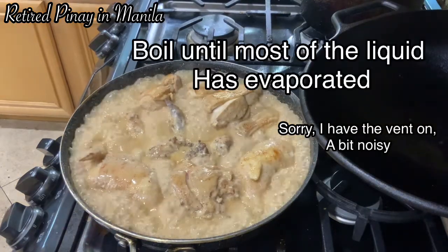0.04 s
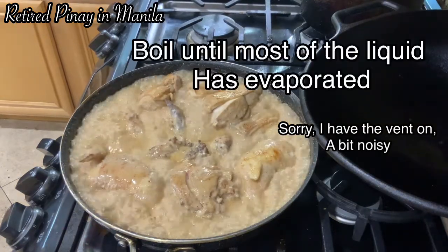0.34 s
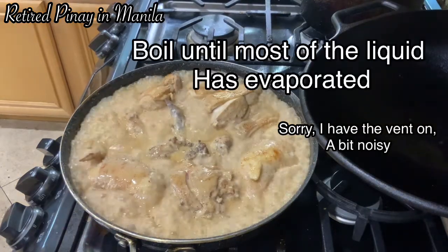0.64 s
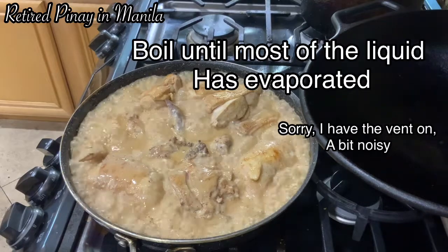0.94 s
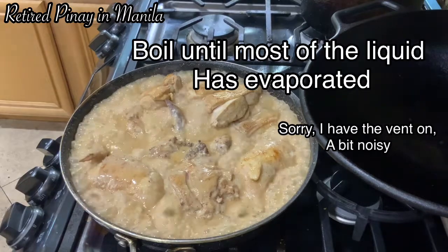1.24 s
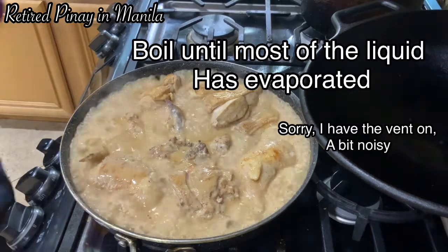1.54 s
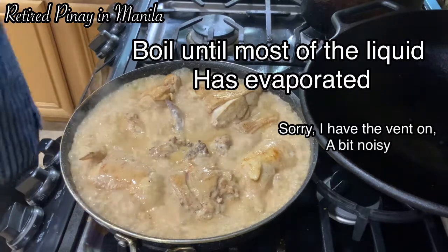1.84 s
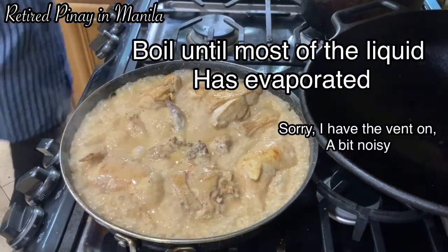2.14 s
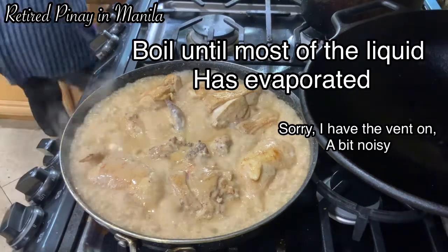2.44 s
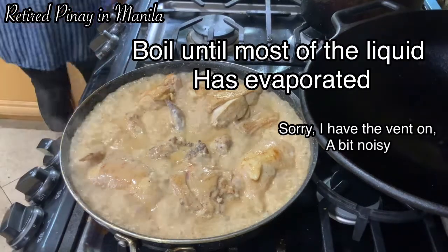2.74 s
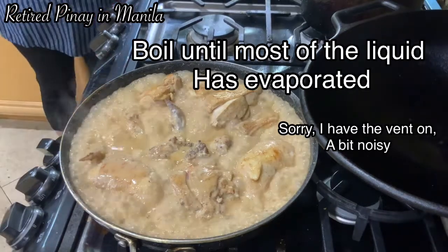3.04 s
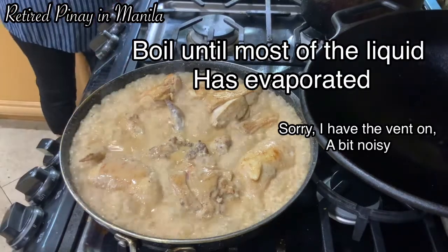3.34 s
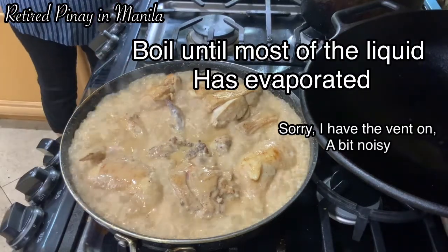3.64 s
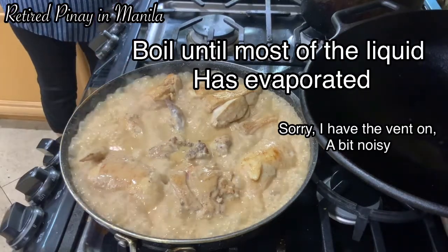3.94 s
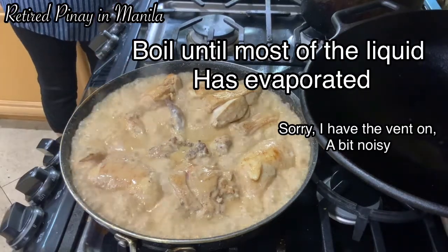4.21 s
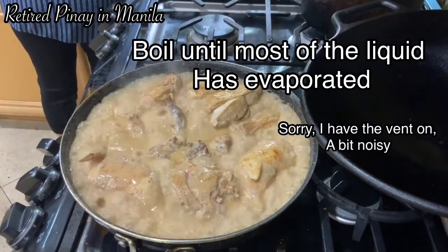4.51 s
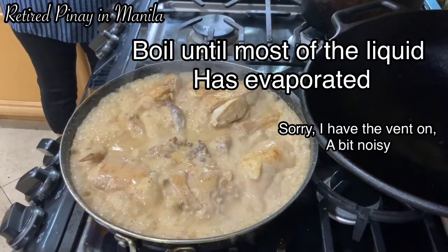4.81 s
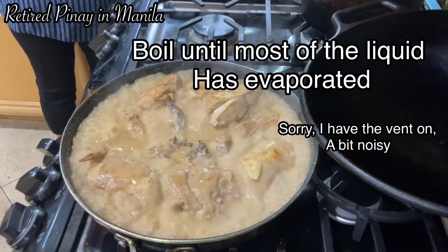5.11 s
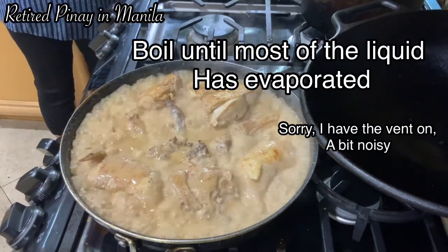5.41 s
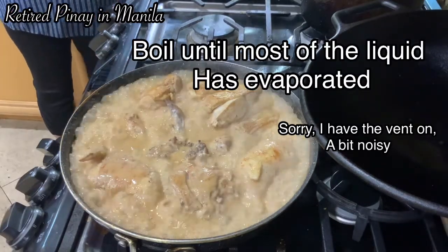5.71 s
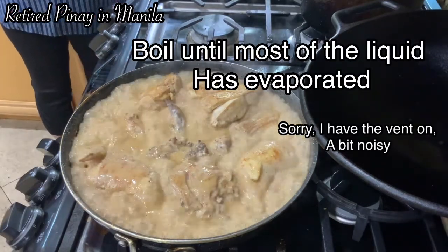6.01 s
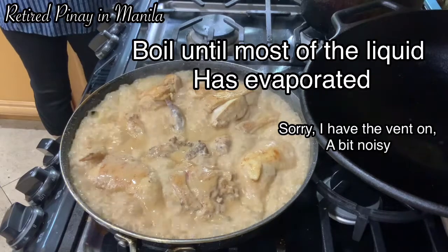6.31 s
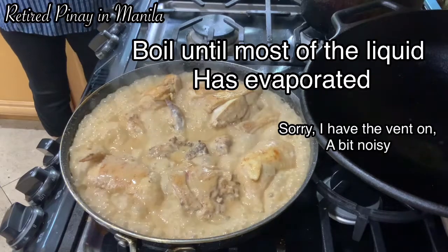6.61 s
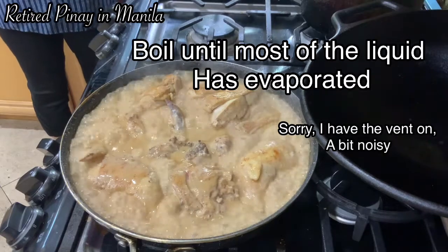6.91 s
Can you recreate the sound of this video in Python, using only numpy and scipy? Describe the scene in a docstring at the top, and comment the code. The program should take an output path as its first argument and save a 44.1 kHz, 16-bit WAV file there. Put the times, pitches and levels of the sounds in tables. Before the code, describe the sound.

A range hood fan roars steadily in a small home kitchen, with a stew fizzing and popping softly beneath it. Partway through, utensils knock on the counter a few steps away, and a spoon drops into a metal bowl with a loud, briefly ringing clatter. A tap then starts hissing and later runs a little harder, with small splashes in the sink. The microphone is close to the stove.

```python
"""Kitchen under a range hood

Turbulent air roars in the resonances of a hood and duct, over the bursting bubbles of a simmering stew.
A few steps away utensils knock on the counter, and a spoon drops into a metal bowl, exciting the modes
of both; then a tap hisses with the impacts of countless drops. A close pair of microphone ports picks
up the small kitchen, and a limiter ducks the loudest clatter."""
import sys
import numpy as np
from scipy import signal
from scipy.fft import rfft, irfft, next_fast_len
from scipy.io import wavfile
from scipy.ndimage import uniform_filter1d

SR = 44100
rng = np.random.default_rng(int(sys.argv[2]) if len(sys.argv) > 2 else 0)


def generate_wav(sig):
    """Save sig (samples, or channels by samples) to the path in sys.argv[1] as 16-bit PCM at SR."""
    pcm = np.round(np.clip(np.atleast_2d(sig).T, -1, 1) * 32767).astype(np.int16)
    wavfile.write(sys.argv[1], SR, pcm)


N = 311346
BLOW_SAMPLES = 2 ** 15

# Spectrum of air rushing through the hood: frequency_hz, density_db
AIR_SPECTRUM = [(15, -69), (32, -39), (45, -28), (70, -7.5), (110, -4), (170, -6), (300, -13.5), (480, -13),
                (720, -13), (1050, -17), (1900, -24.5), (2700, -31.5), (6000, -33.5), (16000, -47)]
# Resonances of hood and duct: centre_hz, width_hz, lift_db
DUCT_RESONANCES = [(88.5, 19, 1), (111.6, 27.5, 6.5), (174, 29, -2.5), (208.6, 18, 2.5), (219.4, 12, 5),
                   (268.6, 63, 4), (312, 29, -2.5), (363, 35, 5), (482, 44, 6), (587, 22, -1.5),
                   (611.6, 20, 7), (708, 30, 4.5), (815, 18, 5), (986, 16, -2), (1136, 25, -5),
                   (1250, 270, 1.5), (2044, 170, 3)]
# Faint tones of the motor: pitch_hz, level_db
MOTOR_TONES = [(110, -37), (1702, -50)]
# Rises of the deep rumble: centre_s, half_width_s, level_db
RUMBLE_SWELLS = [(2.93, 0.061, -34), (3.4, 0.1, -36), (7.0, .35, -38)]
# Spectrum of bubbling in the pan: frequency_hz, density_db
SIMMER_SPECTRUM = [(500, -22), (2000, -4), (3500, -5), (7000, -1.5), (10000, -7), (13000, -7),
                   (16000, -15.5)]
# Larger bubbles bursting, and after the tap opens, drips landing: start_s, level_db
SMALL_POPS = [(.072, -31), (.677, -31.5), (.905, -25.5), (1.062, -30.5), (1.545, -27), (1.572, -31.5),
              (5.023, -28), (5.556, -25), (6.043, -25.5), (6.777, -27)]
# Utensils knocking as they are moved: start_s, clack_db, clack_hz, shine_db, thud_db, thud_hz, ring_db
UTENSIL_KNOCKS = [(2.629, -19.5, 8450, 5, -24, 700, -23), (2.804, -21.5, 12000, 5.5, -24, 400, -26),
                  (2.902, -11.5, 5800, 5, -19, 250, -18.5), (2.910, -21, 5800, 2, -33, 1300, -25),
                  (2.918, -28, 1800, 0, -16.5, 300, -33), (2.940, -26, 5800, -2, -33, 300, -27),
                  (2.983, -19, 2520, -5, -10, 260, -32), (3.005, -32, 5000, -6, -19.5, 690, -35),
                  (3.032, -33, 4500, -4, -15, 170, -43), (3.163, -31, 4000, 0, -27, 450, -34),
                  (3.501, -31, 7500, 0, -36, 250, -39)]
# Spectrum of a hard impact: frequency_hz, density_db
CLACK_SPECTRUM = [(100, -22.5), (900, 10.5), (1300, -11), (1650, 2), (2100, -4), (2500, -0.5), (3500, -4.5),
                  (4700, -0.5), (5800, 1), (7200, -0.5), (8600, -3.5), (10500, -13), (12600, -11.5),
                  (13500, -14), (16000, -26)]
# Modes of the cutlery: pitch_hz, level_db, t60_s
CUTLERY_MODES = [(1680, -3, .35), (2660, -9, .33), (3060, -10, .33), (3870, -6, .22), (4690, 1.5, .2),
                 (5330, 0, .17), (6040, 2, .14), (6270, -2, .16), (6930, 1, .18), (8200, 0, .16),
                 (8430, -1, .15), (9436, -1, .14), (9900, -2, .12), (12000, -6, .1)]
# Resonances of the counter: centre_hz, width_hz, lift_db
COUNTER_RESONANCES = [(195, 64, -4), (297, 33, 5.5), (363, 18, 6.5), (478, 46, 7), (556, 53, -2),
                      (796, 180, 3), (940, 110, 5.5), (1117, 88, 6)]
# The spoon touches the bowl, rattles into it and rebounds:
# start_s, clack_db, clack_hz, shine_db, thud_db, thud_hz, bowl_db, spoon_db, reach_hz
SPOON_BLOWS = [(2.759, -45, 4700, 0, -28, 600, -50, -39, 6000),
               (3.223, -25, 8000, 6, -33, 810, -50, -43, 15000),
               (3.234, -22, 12000, 3, -36, 600, -50, -43, 15000),
               (3.251, -16.5, 2450, 4, -20, 300, -38, -22, 14000),
               (3.270, -19, 11500, 4, -19.5, 800, -35, -34, 15000),
               (3.281, -8, 1610, 6, -14, 400, -30, -23, 15000),
               (3.289, -5, 4500, 6, -7, 750, -9.5, -17, 16000),
               (3.298, -11, 12000, 3, -12, 900, -28, -34, 16000),
               (3.354, -24, 3000, -5, -8, 740, -24, -21, 3380)]
# Modes of the metal bowl: pitch_hz, level_db, t60_s
BOWL_MODES = [(520, 3, .2), (646, -2, .3), (915, 7, .33), (1150, -2, .3), (1525, 5, .14), (1700, -1, .36),
              (2130, -5, .15), (2508, -7, .15), (2652, -3, .42), (3035, -7, .52), (3872, -.5, .57),
              (4048, -7, .36), (4605, 5, .3), (5283, 1.5, .36), (6182, 5.5, .31), (6418, -4.5, .52),
              (6558, -3, .33), (7980, 11, .3), (8330, 1.5, .23), (8516, 2.5, .22), (9969, -1, .2),
              (10500, -2, .18), (11150, -3, .17), (11447, -1, .2), (12620, -2, .17), (13345, -7, .2),
              (14949, -7, .17)]
# Modes of the spoon: pitch_hz, level_db, t60_s
SPOON_MODES = [(2540, -5, .08), (3157, -1.5, .27), (4500, -1, .07), (4686, 5, .14), (5500, -7, .08),
               (5950, -5, .1), (6600, -4, .14), (7250, -5, .09), (8060, -5, .11), (8750, -4, .1),
               (9100, -4, .12), (11902, -7, .12), (13748, -10, .12)]
# Spray added by each turn of the tap: start_s, level_db
TAP_OPENINGS = [(3.77, -35.5), (5.52, -35)]
# Spectrum of the tap water: frequency_hz, density_db
SPRAY_SPECTRUM = [(400, -27), (2000, -8.5), (3900, -7.5), (4900, -4.5), (5400, -2.5), (6500, -1),
                  (10000, -1.5), (12500, -0.5), (16000, -10)]
# The stream catching something in the sink: centre_s, half_width_s, level_db
SINK_SPLASHES = [(4.02, 0.035, -30), (4.27, 0.039, -33), (5.81, 0.023, -26.5), (5.95, .025, -31)]
# Likeness of the sound at the two ports: frequency_hz, coherence
PORT_COHERENCE = [(50, .995), (110, .985), (200, .95), (300, .86), (450, .72), (800, .42), (1250, .68),
                  (1950, .2), (2400, .53), (3000, .5), (3800, .95), (4500, .77), (8300, .8), (9100, .999),
                  (10700, .999), (11200, .7), (12900, .65), (13300, .99)]
# Phase by which the left port leads: frequency_hz, lead_rad
PORT_PHASE = [(110, 0), (250, .15), (340, .8), (460, .1), (520, .9), (620, 2.5), (900, 3.7), (1000, 5.7),
              (1350, 6.1), (1650, 4.3), (1950, 4.9), (2300, 3.5), (2900, 1.1), (3500, .05), (6500, -1.05),
              (8000, -2.0), (9000, -3.13), (10850, -3.16), (11150, -3.9), (12900, -5.3), (13300, -6.28)]
# Level of the left port above the right: frequency_hz, balance_db
PORT_BALANCE = [(50, 0), (150, -1), (250, 0), (315, -1), (370, 3.5), (440, 3.5), (520, -1.5), (690, 4),
                (900, -2.5), (1050, 0), (1450, -2), (1850, 1), (2060, -5), (2400, -1), (6000, 0)]


def gain_of(db):
    """Amplitude ratio of a level in decibels."""
    return 10 ** (np.asarray(db) / 20)


def unit_rms(x):
    """Normalisation to an rms of 1."""
    return x / np.sqrt(np.mean(x ** 2) + 1e-20)


def curve_at(points, hz):
    """Interpolation of a table along a logarithmic frequency axis."""
    table_hz, value = np.transpose(points)
    return np.interp(np.log(hz + 1), np.log(abs(table_hz) + 1), value)


def lifts(resonances, hz):
    """Gain in dB of a set of resonances, each a Gaussian peak or dip."""
    return sum(db * np.exp(-2 * ((hz - centre) / width) ** 2) for centre, width, db in resonances)


def hump(hz, centre_hz, slope_db):
    """Gain in dB of a broad resonance, slope_db down one octave from its centre."""
    return -slope_db * np.log2((hz + 1) / centre_hz) ** 2


def coloured(x, db_at):
    """Spectral shaping by a gain in dB at each frequency; rms 1."""
    size = x.shape[-1]
    padded = next_fast_len(size)
    response = gain_of(db_at(np.fft.rfftfreq(padded, 1 / SR)))
    return unit_rms(irfft(rfft(x, padded) * response, padded)[..., :size])


def drift(top_hz):
    """Slow fluctuation from sinusoids of random phase; rms 1."""
    t = np.arange(0, N + 256, 256) / SR
    rates_hz = np.geomspace(top_hz / 20, top_hz, 20)
    slow = sum(np.sin(2 * np.pi * (hz * t + rng.random())) / np.sqrt(hz) for hz in rates_hz)
    return np.interp(np.arange(N) / SR, t, unit_rms(slow))


def swell(centre_s, half_width_s):
    """Gaussian envelope that rises to 1 and falls back."""
    return np.exp(-((np.arange(N) / SR - centre_s) / half_width_s) ** 2)


def decay(t, t60_s):
    """Exponential damping of 60 dB in t60_s."""
    return np.exp(-np.log(1000) * t / t60_s)


def add(mix, start_s, sound):
    """Superposition of a sound on the mix from start_s onward."""
    part = mix[:, round(start_s * SR):][:, :sound.shape[1]]
    part += sound[:, :part.shape[1]]


def burst(db_at, rise_s, t60_s, room_db, room_t60_s=0.55):
    """Reverberation of a blow: dense early reflections and the room's weaker tail add in power."""
    t = np.arange(BLOW_SAMPLES) / SR
    early = decay(np.maximum(t - rise_s, 0), t60_s)
    late = gain_of(room_db) * decay(t, room_t60_s)
    envelope = np.hypot(early, late) * np.minimum(t / rise_s, 1)
    return coloured(rng.standard_normal((2, BLOW_SAMPLES)), db_at) * envelope


def crackle(spectrum, per_s, spread_db, room_db, room_t60_s):
    """Shot noise: random impulses of uneven size, each with a short wash of reflections."""
    sizes = gain_of(spread_db * np.minimum(rng.exponential(1, N), 5))
    occurs = rng.random(N) < per_s / SR
    clicks = sizes * occurs * rng.standard_normal((2, N))
    t = np.arange(SR // 4) / SR
    room = rng.standard_normal((2, len(t))) * decay(t, room_t60_s)
    wash = signal.oaconvolve(clicks, room, axes=1)[:, :N]
    return coloured(unit_rms(clicks) + gain_of(room_db) * unit_rms(wash), lambda hz: curve_at(spectrum, hz))


def hood(air_db=-21.5, surge_db=0.03, swell_db=2.5, pitch_waver=0.00312):
    """Broadband turbulence excites the duct resonances, over the wavering tones of the motor."""
    turbulence = rng.standard_normal((2, N))
    air = coloured(turbulence, lambda hz: curve_at(AIR_SPECTRUM, hz) + lifts(DUCT_RESONANCES, hz))
    air *= gain_of(air_db - surge_db * drift(top_hz=6))
    middle = signal.sosfiltfilt(signal.butter(2, [200, 800], "bandpass", fs=SR, output="sos"), air)
    air += middle * (gain_of(swell_db * swell(0.88, 0.29)) - 1)  # the middle of the roar swells once
    for hz, db in MOTOR_TONES:
        cycles = np.cumsum(hz * (1 + pitch_waver * drift(top_hz=5))) / SR
        air[0] += gain_of(db) * 2 * np.sin(2 * np.pi * cycles)  # both ports share the tone
    return air


def rumble(centre_hz=54, slope_db=30, steady_db=-52):
    """Low-frequency band noise lies under the roar and rises now and then."""
    envelope = gain_of(steady_db) + sum(gain_of(db) * swell(s, width) for s, width, db in RUMBLE_SWELLS)
    return envelope * coloured(rng.standard_normal((2, N)), lambda hz: hump(hz, centre_hz, slope_db))


def pan(simmer_db=-37.5):
    """Bursting bubbles emit pressure pulses: small ones merge into a fizz, larger ones pop singly; once the tap
    runs, drips pop singly too."""
    fizz = crackle(SIMMER_SPECTRUM, per_s=2200, spread_db=3.5, room_db=9.5, room_t60_s=0.14)
    out = gain_of(simmer_db) * fizz
    for start_s, db in SMALL_POPS:
        pop = burst(lambda hz: curve_at(SIMMER_SPECTRUM, hz), rise_s=0.0007, t60_s=0.045, room_db=-20)
        add(out, start_s, gain_of(db) * pop)
    return out


def clack(pitch_hz, shine_db, rise_s, t60_s, lift_db=9, lift_octaves=0.14, damp_hz=8500, shine_hz=9000):
    """Brief, hard contact radiates a broad spectrum; sharp edges add treble shine, which dies first."""
    def spectrum(hz):
        shine = shine_db * (1 - 1 / (1 + (hz / shine_hz) ** 8))
        peak = lift_db * np.exp(-(np.log2((hz + 1) / pitch_hz) / lift_octaves) ** 2)
        return curve_at(CLACK_SPECTRUM, hz) + shine + peak
    crack = burst(spectrum, rise_s, t60_s, room_db=-11.5)
    body = signal.sosfiltfilt(signal.butter(2, damp_hz, fs=SR, output="sos"), crack)
    return body + (crack - body) * decay(np.arange(BLOW_SAMPLES) / SR, t60_s=0.58)


def ring(modes, reach_hz, rise_s, flutter_depth=0.55, twin_gain=0.35, mean_beat_hz=14):
    """Free vibration of metal: each damped mode beats with a close twin and flutters in the room."""
    t = np.arange(BLOW_SAMPLES) / SR
    coarse_t = np.linspace(0, t[-1], num=80)
    out = np.zeros((2, BLOW_SAMPLES), complex)
    for hz, db, t60_s in modes:
        real, imaginary = rng.standard_normal((2, 2, len(coarse_t)))
        flutter = flutter_depth * (real + 1j * imaginary) / np.sqrt(2)
        beat_hz = mean_beat_hz * (0.5 + rng.random((2, 1)))
        twin = twin_gain * np.exp(2j * np.pi * beat_hz * coarse_t)
        envelope = (1 + twin + flutter) * decay(coarse_t, t60_s)
        amplitude = gain_of(db) / np.hypot(1, (hz / reach_hz) ** 4)  # soft blows miss the high modes
        tone = amplitude * np.exp(2j * np.pi * (hz * t + rng.random()))
        out += tone * np.array([np.interp(t, coarse_t, row) for row in envelope])
    power = (1 + twin_gain ** 2 + flutter_depth ** 2) * sum(gain_of(db) ** 2 for _, db, _ in modes) / 2
    return np.array([out[0].real, out[1].imag]) / np.sqrt(power) * np.minimum(t / rise_s, 1)


def thud(pitch_hz, t60_s, slope_db, rise_s=0.0036):
    """An impact excites the hollow resonances of the counter."""
    def spectrum(hz):
        return hump(hz, pitch_hz, slope_db) + lifts(COUNTER_RESONANCES, hz)
    return burst(spectrum, rise_s, t60_s, room_db=-12.5)


def utensils(reach_hz=14000, rise_s=0.0033, t60_s=0.145):
    """Impact excitation: each knock clacks and sets the cutlery and the counter vibrating."""
    out = np.zeros((2, N))
    for start_s, clack_db, clack_hz, shine_db, thud_db, thud_hz, ring_db in UTENSIL_KNOCKS:
        add(out, start_s, gain_of(clack_db) * clack(clack_hz, shine_db, rise_s, t60_s))
        add(out, start_s, gain_of(ring_db) * ring(CUTLERY_MODES, reach_hz, rise_s))
        add(out, start_s, gain_of(thud_db) * thud(thud_hz, t60_s, slope_db=5.5))
    return out


def spoon_in_bowl(ring_boost_db=7, rise_s=0.0039, t60_s=0.12):
    """A collision excites both bodies: spoon and bowl ring in their own modes over a clack and thud."""
    out = np.zeros((2, N))
    for start_s, clack_db, clack_hz, shine_db, thud_db, thud_hz, bowl_db, spoon_db, reach_hz in SPOON_BLOWS:
        add(out, start_s, gain_of(clack_db) * clack(clack_hz, shine_db, rise_s, t60_s))
        add(out, start_s, gain_of(ring_boost_db + bowl_db) * ring(BOWL_MODES, reach_hz, rise_s))
        add(out, start_s, gain_of(ring_boost_db + spoon_db) * ring(SPOON_MODES, reach_hz, rise_s))
        add(out, start_s, gain_of(thud_db) * thud(thud_hz, t60_s, slope_db=5))
    return out


def tap(turn_s=0.027, growth_db_per_s=1.5, sputter_db=0.55):
    """Incoherent drop impacts add in power: splashes, and a slowly growing spray from each turn."""
    t = np.arange(N) / SR
    power = sum((gain_of(db) * swell(s, width)) ** 2 for s, width, db in SINK_SPLASHES)
    for start_s, db in TAP_OPENINGS:
        opening = np.clip((t - start_s) / turn_s, 0, 1)
        power += (opening * gain_of(db + growth_db_per_s * (t - start_s))) ** 2
    spray = crackle(SPRAY_SPECTRUM, per_s=3200, spread_db=3.4, room_db=9, room_t60_s=0.15)
    sputter = gain_of(sputter_db * drift(top_hz=60))
    return np.sqrt(power) * sputter * spray


def ports(field):
    """Partial coherence: the field's shared and unshared rows combine into left and right."""
    size = next_fast_len(N + 4096)
    hz = np.fft.rfftfreq(size, 1 / SR)
    shared, apart = rfft(field, size)
    coherence = np.clip(curve_at(PORT_COHERENCE, hz), 0, 1)
    shared *= np.sqrt((1 + coherence) / 2)
    apart *= np.sqrt((1 - coherence) / 2)
    lean = gain_of(curve_at(PORT_BALANCE, hz) / 2) * np.exp(1j * curve_at(PORT_PHASE, hz) / 2)
    return irfft(np.array([(shared + apart) * lean, (shared - apart) / lean]), size)[:, :N]


def scene():
    """Superposition of all the sources at the two ports."""
    return ports(hood() + rumble() + pan() + utensils() + spoon_in_bowl() + tap())


def record(dry, limit_db=-6, recover_db_per_s=22, cutoff_hz=15750):
    """Limiting: the gain falls on the loudest blow and recovers slowly; clipping and a low-pass follow."""
    power = uniform_filter1d((dry ** 2).mean(0), size=130)
    power_db = 10 * np.log10(abs(power) + 1e-12)
    recovery_db = np.arange(N) / SR * recover_db_per_s
    held_peak_db = np.maximum.accumulate(power_db + recovery_db) - recovery_db
    duck_db = uniform_filter1d(np.maximum(held_peak_db - limit_db, 0), size=100)
    limited = np.clip(dry / gain_of(duck_db), -1, 1)
    low_pass = signal.firwin(511, cutoff_hz, window=("kaiser", 9), fs=SR)
    return signal.oaconvolve(limited, low_pass[None], "same")


dry = scene()
out = record(dry)
generate_wav(out)
```